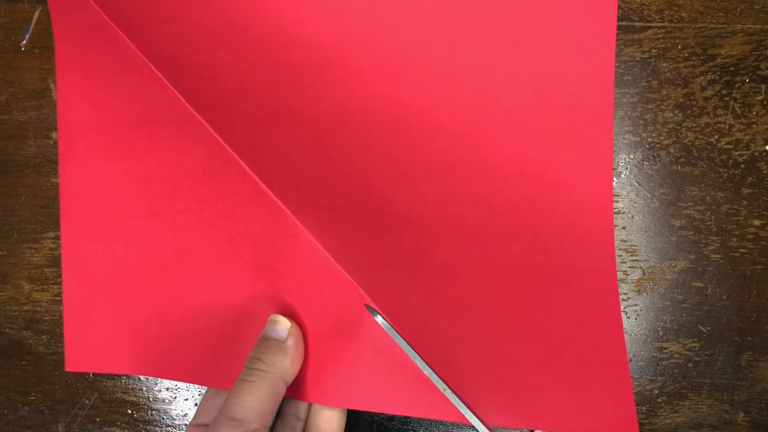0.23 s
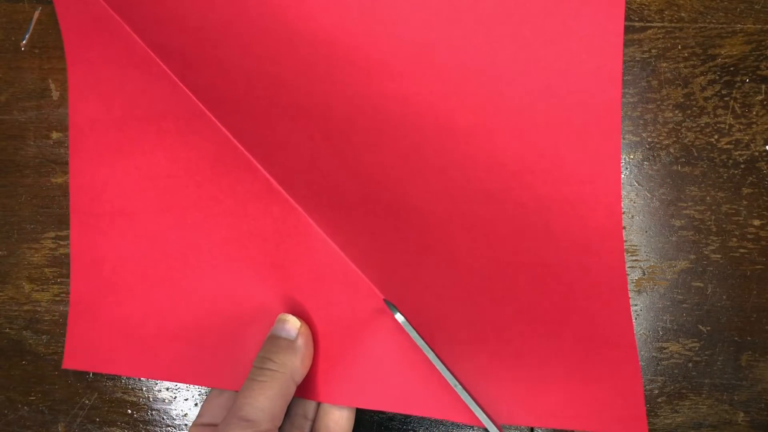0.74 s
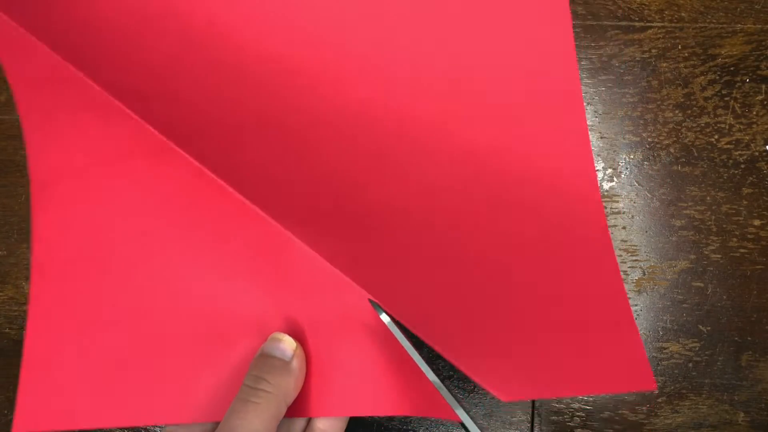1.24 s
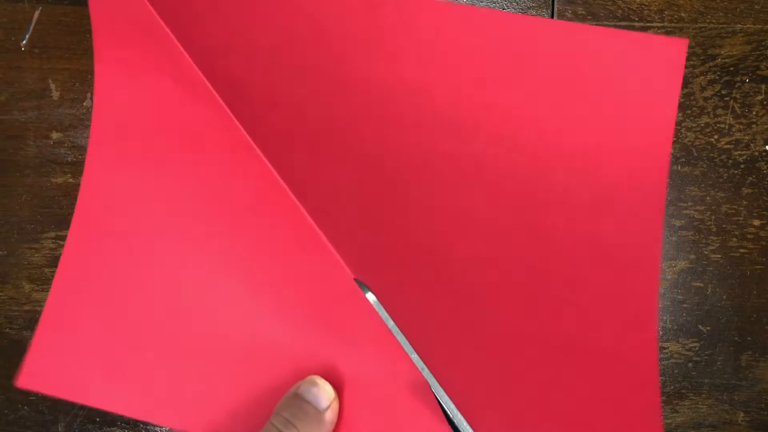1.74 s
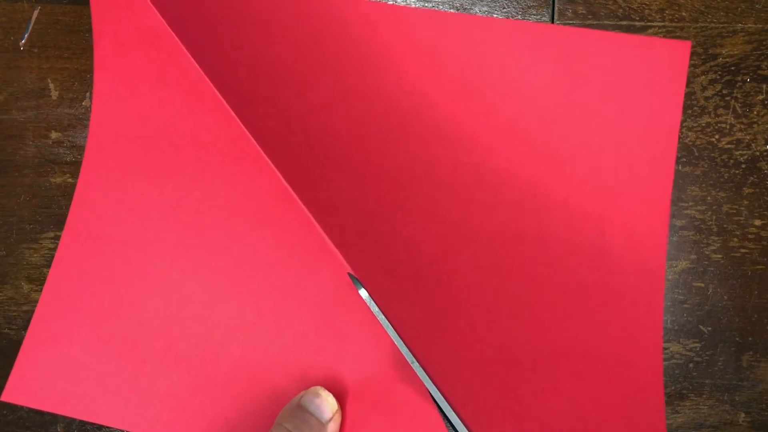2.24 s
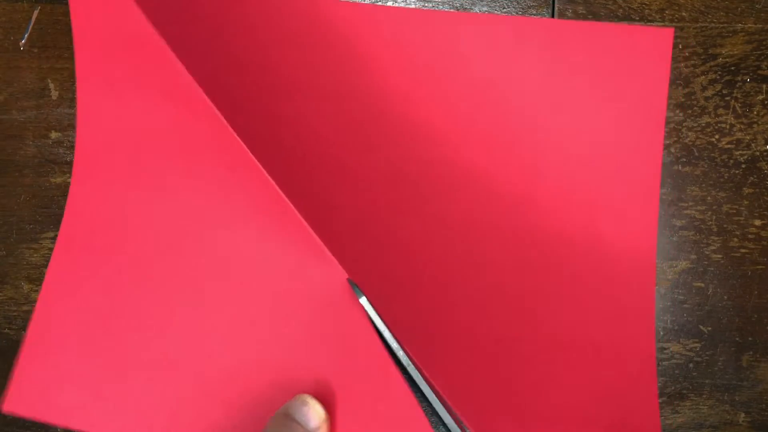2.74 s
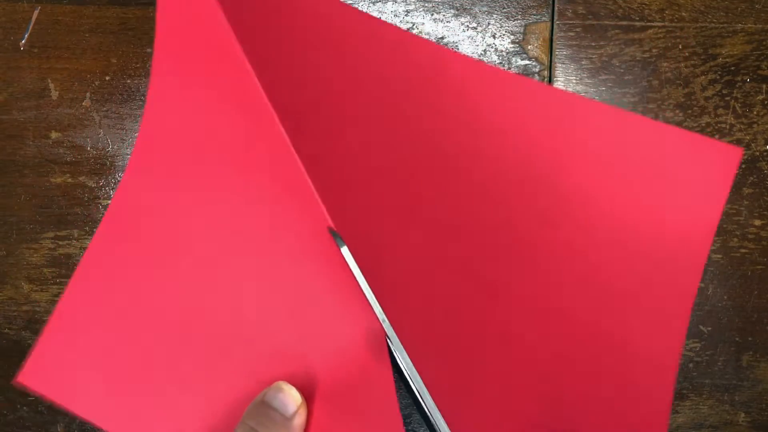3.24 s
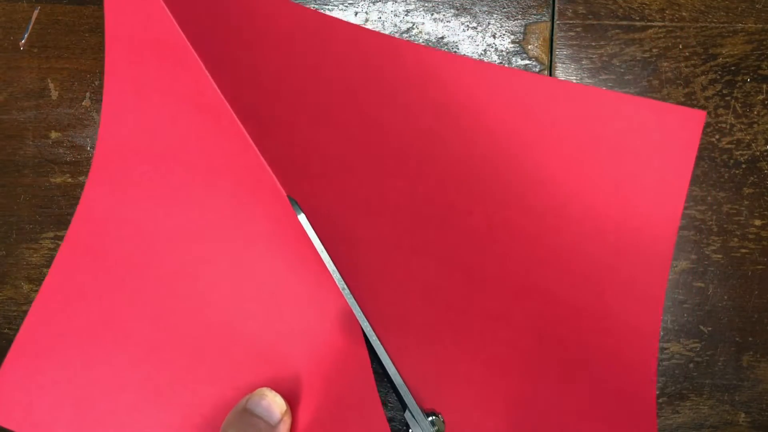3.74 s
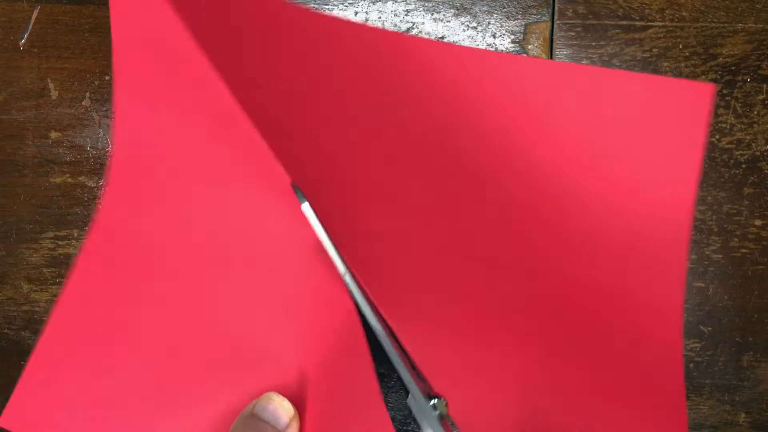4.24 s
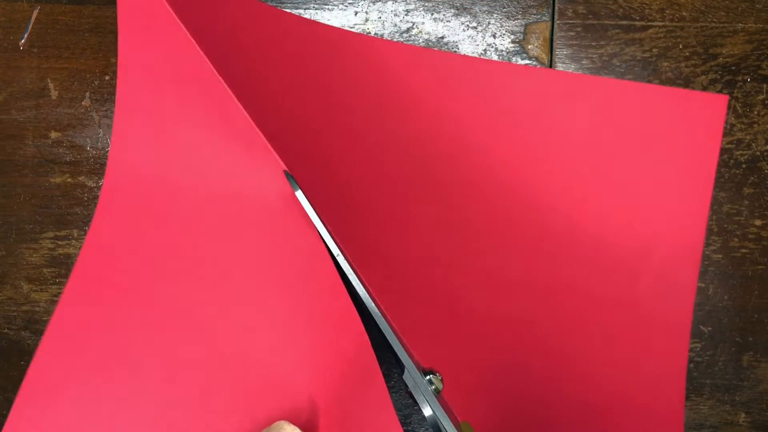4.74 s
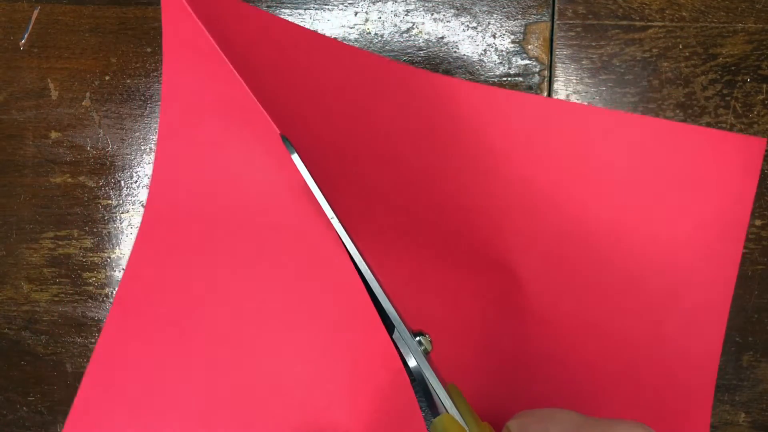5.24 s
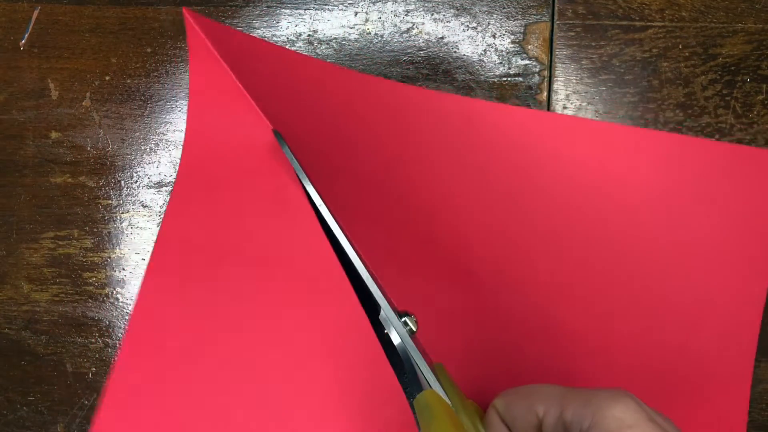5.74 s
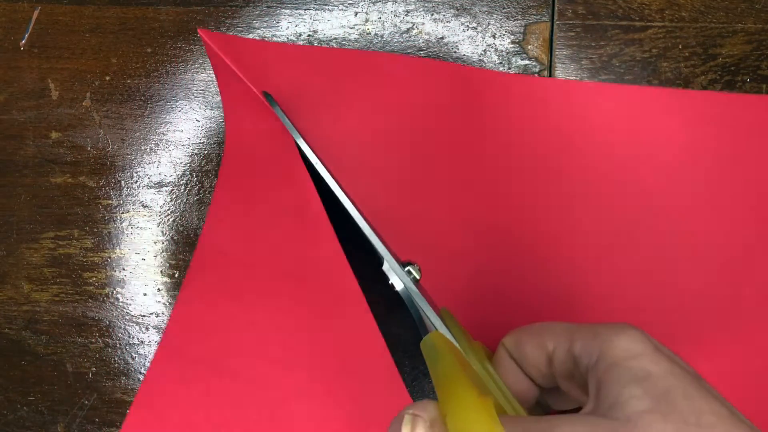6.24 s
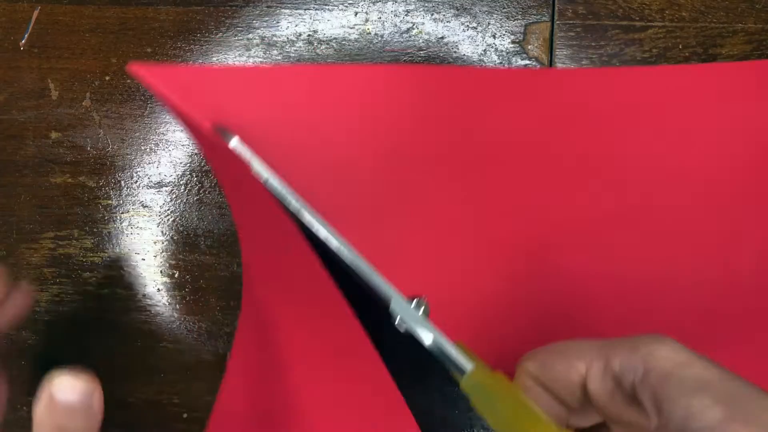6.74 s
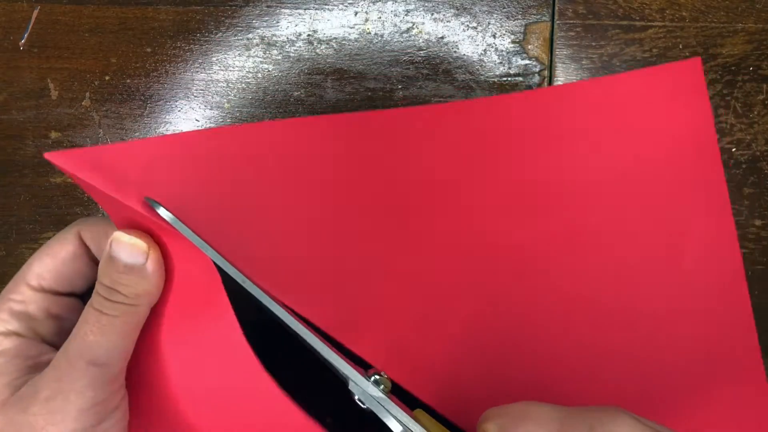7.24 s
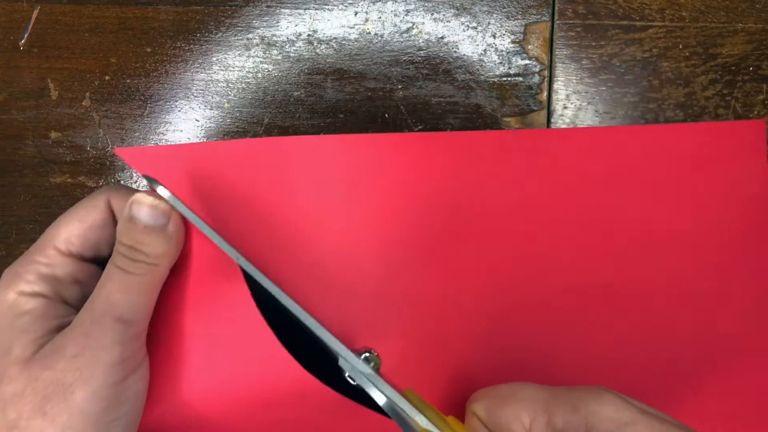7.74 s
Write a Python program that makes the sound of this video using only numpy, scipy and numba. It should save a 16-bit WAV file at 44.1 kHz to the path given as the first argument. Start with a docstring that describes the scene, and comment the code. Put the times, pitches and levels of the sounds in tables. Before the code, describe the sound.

Scissors cut stiff paper in crisp, jerky crunching bursts, with papery rasps and dull sheet knocks between, close up in a quiet room.

```python
"""Quiet room, stiff folded paper held over a wooden table, scissors at work; one microphone, close by.
First the closing blades tear in quick jerks; from 0.9 s sliding rasps lead, then jerks return from 1.8 s.
Rasps at 2.7 s, more jerks from 3.3 s, the strongest near 5.7 s; after 6.6 s mostly faint rasps and ticks.
Random tiny fibre cracks are heard bare, through ringing sheet and blades, and through the loose flap;
dull knocks, snaps and low thumps fall between, over a short room echo and steady hush."""
import sys
import numpy as np
from scipy import signal
from scipy.io import wavfile
from numba import njit

SR = 44100
rng = np.random.default_rng(int(sys.argv[2]) if len(sys.argv) > 2 else 0)


def int16_out(signal):
    """Quantize to a 16-bit WAV file."""
    q = np.round(np.clip(np.atleast_2d(signal).T, -1, 1) * 32767)
    wavfile.write(sys.argv[1], SR, q.astype(np.int16))


N = 353064   # samples, 8 s

BEND_PER_S = 4.94   # how often the bending paper changes its colour
PITCH_WANDER = 0.05   # share by which bending detunes each resonance


def from_db(db):
    """Decibels to gain."""
    return 10 ** (np.asarray(db) / 20)


def rms_one(x):
    """Scale to unit rms."""
    return x / np.sqrt(np.mean(x ** 2) + 1e-20)


def drift(rate):
    """Slow chance of spread 1, changing about rate times a second: noise through a two-pole low-pass."""
    step = 20   # samples between drawn points
    r = np.exp(-2 * np.pi * rate * step / SR)
    slow = signal.lfilter([1], [1, -2 * r, r * r], rng.standard_normal(N // 10))
    slow = rms_one(slow[-N // step:])   # the settled part
    return np.interp(np.arange(N) / step, np.arange(len(slow)), slow)


def coloured(x, spectrum, patchy_db=0, count=11):
    """Band-passes, count to the octave, alternate in sign; each follows the spectrum and wanders in level."""
    hz, db = np.transpose(spectrum)
    edges = hz[0] * 2 ** np.arange(0, np.log2(hz[-1] / hz[0]), 1 / count)
    out = 0
    for k, (low, high) in enumerate(zip(edges, edges[1:])):
        level_db = np.interp(np.log(low * high) / 2, np.log(hz), db)
        gain = from_db(level_db + patchy_db * drift(BEND_PER_S))
        band = signal.butter(2, [low, high], "band", fs=SR, output="sos")
        out = out + (-1) ** k * gain * signal.sosfilt(band, x)
    return out


@njit
def swept(x, pull, r):
    """Each row passes twice through a resonance whose centre moves; pull is the cosine of its turn per sample."""
    out = x.copy()
    for row in range(x.shape[0]):
        for _ in range(2):
            x1 = x2 = y1 = y2 = 0.
            for i in range(x.shape[1]):
                y = (1 - r * r) / 2 * (out[row, i] - x2) + 2 * r * pull[i] * y1 - r * r * y2
                x2, x1, y2, y1 = x1, out[row, i], y1, y
                out[row, i] = y
    return out


# Balance between the two colourings of sheet and blades: time_s, second_share (0-1)
COLOUR_BALANCE = [(1.9, 0), (4.781, 0.84), (6.3, 1), (6.5, 0.96), (7.599, 0.64)]


def resonant(x, modes, patchy_db):
    """Parallel resonances; their balance shifts over time, level and pitch wander as the paper bends."""
    second_share = np.interp(np.arange(N) / SR, *np.transpose(COLOUR_BALANCE))
    out = 0
    for hz, width, first_db, second_db in modes:
        turn = 2 * np.pi * hz * np.exp(PITCH_WANDER * drift(BEND_PER_S)) / SR
        level_db = first_db + second_share * (second_db - first_db)
        gain = from_db(level_db + patchy_db * drift(BEND_PER_S))
        ring = swept(x + 1e-18, np.cos(turn), np.exp(-np.pi * width / SR))
        out = out + gain * ring
    return out


# Room and microphone noise, its relative spectrum: pitch_hz, level_db (per Hz)
HUSH_SPECTRUM = [(40, -10), (120, -1), (250, -2), (600, -10), (1500, -10), (4000, -14), (9000, -23),
                 (19000, -55)]
HUSH_DB = -66   # rms, ahead of the microphone


def hush():
    """Steady noise of room and microphone: white noise in coloured bands."""
    return from_db(HUSH_DB) * rms_one(coloured(rng.standard_normal(N), HUSH_SPECTRUM, count=4))


ROOM_T60_S, ROOM_DB, WALL_CUT_HZ = 0.22, -21.5, 8200   # T60 of the bass; treble dies sooner


def room(x):
    """Ten feedback delays, duller on every round, stepped block by block."""
    out, dull = np.zeros(N), np.exp(-2 * np.pi * WALL_CUT_HZ / SR)
    lags = (rng.uniform(.006, .025, 10) * SR).astype(int)
    for k, lag in enumerate(lags):
        loop, gain, state = x.copy(), from_db(-60 * lag / SR / ROOM_T60_S), [0.]
        for i in range(lag, N, lag):
            back, state = signal.lfilter([gain * (1 - dull)], [1, -dull], loop[i - lag:i], zi=state)
            loop[i:i + lag] += back[:N - i]
        out += (loop - x) * (-1) ** k   # the echoes alone
    return out


# The whole sheet flaps with a low thump: start_s, level_db (envelope peak), pitch_hz
THUMPS = [(1.256, -36, 470), (1.511, -41, 446), (1.649, -47.5, 168.4), (2.574, -39, 214), (2.62, -43, 165),
          (3.274, -34, 356), (3.685, -47, 314), (5.039, -39.5, 355), (5.229, -39, 252), (5.685, -44, 328)]
THUMP_CYCLES = 2.8   # the swell crests after half of these


def thumps():
    """The whole sheet flaps: a few low cycles that swell and die."""
    out = np.zeros(N)
    for start, db, hz in THUMPS:
        turns = np.arange(SR // 8) / SR * hz
        age = turns / THUMP_CYCLES * 2
        swell = np.e * age * np.exp(-age)   # crest 1
        at = round(start * SR)
        out[at:at + len(turns)] += from_db(db) * swell * np.sin(2 * np.pi * turns)
    return out


CRACKS_PER_S, CRACK_SPREAD_DB = 12000, 3.5


def cracks():
    """Fibres snap at random moments with uneven sizes; rms 1."""
    sizes = from_db(CRACK_SPREAD_DB * np.minimum(rng.exponential(1, N), 5))
    signed = sizes * rng.choice([-1, 1], N)
    return rms_one(signed * (rng.random(N) < CRACKS_PER_S / SR))


def sounded(strength, body, table, patchy_db):
    """A body colours fresh cracks of the given strength, scaled so that steady unit cracks come out at 1."""
    fibres = cracks()
    played, steady = body(np.stack([fibres * strength, fibres]), table, patchy_db)
    return played / np.std(steady)


# The loose flap beside the cut: time_s, pitch_hz, level_db (re crackle and blade strengths together)
FLAP = [(0.95, 4430, -13), (1.05, 4530, -9), (1.3, 3800, -19.5), (1.75, 3430, -1.5), (2.048, 3800, -20),
        (2.97, 4130, -9.5), (3.12, 2700, -27), (3.72, 4740, -15), (3.9, 4980, -19), (6.53, 2570, -12),
        (6.586, 1200, 9), (6.63, 3440, -25), (7.15, 4070, -6), (7.29, 2230, -8.5), (7.46, 2210, -10.5),
        (7.53, 2880, -30)]
FLAP_WIDTH_HZ = 590   # of each of the two passes


def flap_ring(crackle, blades):
    """The loose flap rings on the cracks at a pitch that moves as it bends."""
    when, hz, db = np.transpose(FLAP)
    t = np.arange(N) / SR
    strength = (crackle + blades) * from_db(np.interp(t, when, db))
    mode = (np.interp(t, when, hz), FLAP_WIDTH_HZ, 0, 0)   # alike in both colourings
    return sounded(strength, resonant, [mode], 2.5)


# Sheet resonances in two colourings: pitch_hz, width_hz (each pass), first_db, second_db
SHEET_MODES = [(228, 360, -14.5, -9), (427.5, 164, -7, 0), (764, 282, -0.5, 4.5), (936, 493, 2.5, 3),
               (1495, 161, -5.5, 9)]


def sheet_drumming(strength):
    """The cracks drum on the sheet and excite its low resonances."""
    return sounded(strength, resonant, SHEET_MODES, 2.5)


# Blade resonances in two colourings: pitch_hz, width_hz (each pass), first_db, second_db
BLADE_MODES = [(2666, 1130, -6.5, 6.5), (3270, 396, 7.5, 2), (3300, 2460, -21, 10.5), (4860, 460, -35, 6),
               (5290, 740, -17, 4), (7660, 133, -6.5, 2.5), (9550, 340, -12, -8)]


def blade_ring(strength):
    """The cracks ring in the blades at their higher resonances."""
    return sounded(strength, resonant, BLADE_MODES, 1.8)


# Relative spectrum of the bare crackle: pitch_hz, level_db (per Hz)
CRACKLE_SPECTRUM = [(1800, -6.5), (2500, -1), (4000, -6), (6000, -6), (8500, -6), (12000, -13),
                    (19000, -15.5)]


def bare_crackle(strength):
    """The cracks are heard directly, in patches of colour that wander."""
    return sounded(strength, coloured, CRACKLE_SPECTRUM, 5.0)


# From here, three rows of strength: crackle, sheet, blades.
AFTER_RUSTLE_DB, STROKE_RUSTLE_DB, AFTER_RUSTLE_S = -29.5, -38.5, 0.074   # after a jerk or knock, a stroke


def lingering(strengths, db):
    """Torn fibres go on parting: a faint rustle dies away exponentially."""
    linger = np.exp(-1 / (AFTER_RUSTLE_S * SR))
    return strengths + from_db(db) * signal.lfilter([1 - linger], [1, -linger], strengths)


# Strokes of blades and fingers along the paper: start_s, rise_s (to the turning point), fall_s (from it),
# level_db (crackle at the turning point), rise_db and fall_db (start and end relative to it, positive is
# quieter), sheet_db and blade_db (re crackle)
SLIDES = [(0.037, 0.0099, 0.038, -55.5, 32, 15, -4, -8), (0.11, 0.3, 0.18, -66, -6, 0, -4, -6),
          (0.903, 0.009, 0.099, -46, 5, 30, 6.5, 1.5), (1.029, 0.036, 0.074, -50.5, 2, 13, -8, -3),
          (1.115, 0.063, 0.15, -43.5, 8, 6.5, -1, -20), (1.331, 0.06, 0.052, -60, -16, -11, -4, -7),
          (1.422, 0.068, 0.28, -38.5, 7.5, 14, -11, -4), (1.561, 0.087, 0.091, -54, 6, 3.5, 19.5, 8),
          (1.718, 0.044, 0.1, -64, 4, 16.5, 24, 24), (1.839, 0.011, 0.1, -68, 0, 17, 24.5, 22.5),
          (2.738, 0.016, 0.097, -49.5, 13, 38, 10, 1.5), (2.9, 0.027, 0.054, -44, 16, 7, 0.5, -26),
          (2.967, 0.012, 0.082, -45, -7, 1, -4, 4.5), (3.044, 0.072, 0.055, -38.5, 8.5, 9, -2, 3.5),
          (3.164, 0.081, 0.034, -39, 1, -1, 2.5, -9), (3.367, 0.12, 0.06, -53, 13.5, 1, 9, 2.5),
          (3.609, 0.022, 0.05, -58, -1.5, 3, -4.5, -14.5), (3.699, 0.0095, 0.14, -48.5, -5, 8.5, 9, -14),
          (4.195, 0.047, 0.22, -38, 18, 18.5, 5.5, 2), (4.83, 0.041, 0.25, -39.5, 9.5, 6, 2, 1),
          (5.403, 0.031, 0.18, -39.5, 6.5, 4.5, -1, -1.5), (5.74, 0.016, 0.12, -56, 5, 6, -10, -10),
          (5.848, 0.16, 0.096, -43.5, 7.5, 22, 1.5, 5), (6.355, 0.027, 0.086, -43, 24, 12.5, -2, -0.5),
          (6.467, 0.026, 0.044, -69, -1, 5, 22.5, -22), (6.512, 0.055, 0.11, -48.5, 5.5, 11, 1, 1.5),
          (6.7, 0.078, 0.15, -58, 22, 1.5, -16, -29), (6.947, 0.0093, 0.059, -52.5, 3, 25, -6, 4),
          (7.008, 0.056, 0.1, -49, 9.5, 27, 6, 0), (7.101, 0.055, 0.078, -49, 6, 16, -22, 1),
          (7.215, 0.26, 0.045, -41, 8.5, 5, -12, -14), (7.485, 0.018, 0.052, -46.5, 2, -1, -14, -6),
          (7.5, 0.1, 0.056, -69.5, 10, 4, 25, 5), (7.64, 0.016, 0.047, -38, -6, 13, -1, -7),
          (7.68, 0.089, 0.064, -49.5, 0.5, 12, -9, -2), (7.889, 0.012, 0.12, -59.5, -1, 13, 7.5, 10.5)]
STROKE_EDGE_S, STROKE_RELEASE_S = 0.0045, 0.039


def slides():
    """Each stroke starts abruptly, moves through its middle level and lets go; the grain makes it stumble."""
    out = np.zeros((3, N))
    for start, rise, fall, db, rise_db, fall_db, sheet_db, blade_db in SLIDES:
        end = start + rise + fall
        at = np.arange(round(start * SR), min(round(end * SR), N))
        t = at / SR
        edge = np.clip(np.minimum((t - start) / STROKE_EDGE_S, (end - t) / STROKE_RELEASE_S), 0, 1)
        level_db = np.interp(t, [start, start + rise, end], [db - rise_db, db, db - fall_db])
        out[:, at] += edge * from_db(level_db + np.array([[0], [sheet_db], [blade_db]]))
    out = lingering(out, STROKE_RUSTLE_DB)
    own = np.stack([drift(25.0) for _ in out])   # each body catches the grain a little differently
    grain_db = 1.15 * drift(44) + 0.78 * drift(420) + 2.0 * own
    return out * from_db(grain_db)


# Sharp snaps at the blade edge: start_s, crackle_db, sheet_db, blade_db
SNAPS = [(0.864, -46, -22.5, -45), (1.252, -36, -34, -40), (1.328, -28, -16.5, -48),
         (2.85, -56, -42, -19.5), (2.894, -21.5, -30, -50), (2.97, -50, -26, -37), (3.171, -56, -18, -65),
         (3.53, -37, -33, -54), (3.87, -42, -29, -31), (5.522, -58, -23.5, -56), (5.883, -57, -28.5, -50),
         (6.373, -57, -41, -31.5), (7.078, -36, -36, -25.5), (7.221, -51, -28.5, -32),
         (7.563, -51, -33, -44)]
SNAP_DECAY_S = 0.0015


def snaps():
    """A snap starts at once and dies within a few milliseconds."""
    out, t = np.zeros((3, N)), np.arange(SR // 30) / SR
    for start, *levels_db in SNAPS:
        at = round(start * SR)
        out[:, at:at + len(t)] += np.outer(from_db(levels_db), np.exp(-t / SNAP_DECAY_S))
    return out


JERK_LEAN, JERK_ROUNDNESS = 0.47, 1.52   # a lean below 1 puts the crest early


def add_burst(out, start, length, strengths):
    """Add one rounded burst that swells fast and stops at its length."""
    share = np.linspace(0, 1, round(length * SR))
    shape = np.abs(np.sin(np.pi * share ** JERK_LEAN)) ** JERK_ROUNDNESS
    at = round(start * SR)
    out[:, at:at + len(share)] += np.outer(strengths, shape)


# The sheet buckles with a dull knock: start_s, sheet_db, length_s
KNOCKS = [(1.069, -34, 0.023), (1.095, -33, 0.013), (1.109, -35, 0.0095), (1.165, -30, 0.01),
          (1.193, -30.5, 0.0054), (3.226, -25, 0.02), (4.138, -39, 0.0042), (4.438, -25.5, 0.0028),
          (6.803, -47, 0.022), (6.965, -43, 0.043), (7.157, -30, 0.015)]


def knocks():
    """The buckling sheet knocks: bursts that stir the sheet alone."""
    out = np.zeros((3, N))
    for start, db, length in KNOCKS:
        add_burst(out, start, length, from_db(db) * np.array([0, 1, 0]))
    return out


# Jerks of the closing blades: start_s, level_db (crackle peak), length_s
JERKS = [(0.1144, -30.5, 0.024), (0.1838, -24, 0.014), (0.203, -30.5, 0.0088), (0.228, -32, 0.021),
         (0.275, -20.5, 0.013), (0.319, -28, 0.023), (0.368, -28.5, 0.024), (0.42, -32, 0.02),
         (0.486, -35, 0.011), (0.511, -32.5, 0.039), (0.54, -30.5, 0.017), (0.603, -21, 0.016),
         (0.6316, -23.5, 0.016), (0.652, -28.5, 0.016), (0.674, -25, 0.027), (0.737, -24.5, 0.03),
         (0.776, -21.5, 0.013), (0.801, -21, 0.033), (0.837, -23.5, 0.021), (0.8583, -19.5, 0.012),
         (1.327, -25.5, 0.016), (1.793, -37.5, 0.025), (1.869, -35.5, 0.041), (2.02, -30, 0.048),
         (2.065, -23.5, 0.02), (2.085, -36, 0.042), (2.127, -32, 0.013), (2.164, -28, 0.024),
         (2.233, -30, 0.036), (2.265, -37, 0.035), (2.312, -29, 0.017), (2.408, -43.5, 0.028),
         (2.433, -32, 0.031), (2.466, -33.5, 0.027), (2.503, -28, 0.028), (2.544, -29, 0.014),
         (2.561, -26.5, 0.015), (2.588, -23.5, 0.014), (2.6238, -18.5, 0.0074), (2.871, -31.5, 0.05),
         (3.274, -23, 0.014), (3.401, -38, 0.0095), (3.4593, -32.5, 0.021), (3.505, -33, 0.011),
         (3.675, -28, 0.023), (3.705, -32.5, 0.024), (3.74, -35, 0.013), (3.809, -34.5, 0.0076),
         (3.8413, -35.5, 0.039), (3.901, -22.5, 0.029), (3.928, -32, 0.027), (3.9574, -24, 0.033),
         (4.0156, -20, 0.018), (4.054, -26, 0.017), (4.0898, -25, 0.014), (4.401, -32.5, 0.065),
         (4.537, -21.5, 0.036), (4.561, -28.5, 0.022), (4.583, -21, 0.016), (4.604, -27, 0.026),
         (4.6455, -25, 0.022), (4.666, -33.5, 0.031), (5.173, -31.5, 0.08), (5.198, -21, 0.011),
         (5.216, -20, 0.039), (5.266, -15, 0.012), (5.6476, -22, 0.048), (5.665, -14.5, 0.034),
         (5.6954, -12, 0.028), (5.724, -16, 0.0088), (6.1457, -27.5, 0.043), (6.186, -21, 0.023),
         (6.222, -26, 0.014), (6.549, -27, 0.013), (6.57, -25, 0.0096), (6.77, -51, 0.027),
         (6.827, -39.5, 0.019), (7.056, -40, 0.0074), (6.895, -43, 0.017), (7.306, -36, 0.042),
         (7.595, -51, 0.009), (7.624, -32, 0.022), (7.637, -26, 0.017), (7.939, -39.5, 0.013)]
# What the bodies take up of a jerk as the grip changes: time_s, sheet_db, blade_db (re crackle)
UPTAKE = [(0.1, -18, -47), (0.55, -19.5, -39), (0.62, -20, -26.5), (0.79, -15, -17), (0.86, -2.5, -12),
          (1.33, -8, -37), (1.8, -1, 4.5), (2.06, -7, -12), (2.438, -4, -1.5), (2.63, 4.5, -4.5),
          (2.86, -13, -9), (3.3, 1.5, -10.5), (3.7, -5, -9.5), (4.65, -8, -10.5), (5.2, -12, -18.5),
          (5.72, -18.5, -26), (6.15, -12.5, -15.5), (6.566, -12.5, -16), (7.64, -51, -8)]
CREST_DB = 14.5   # taken from a crackle peak to give its strength


def jerks():
    """Each jerk swells fast and stops when the blades stick again."""
    out = np.zeros((3, N))
    when, sheet_db, blade_db = np.transpose(UPTAKE)
    for start, db, length in JERKS:
        uptake_db = np.array([-CREST_DB, np.interp(start, when, sheet_db), np.interp(start, when, blade_db)])
        add_burst(out, start, length, from_db(db + uptake_db))
    return out


JERK_STUMBLE_DB, SHEET_LAG_S = 0.92, 0.004


def jerks_and_knocks():
    """Bursts leave a rustle and stumble as the tear catches; the sheet takes them up and lets go later."""
    out = lingering(jerks() + knocks(), AFTER_RUSTLE_DB)
    out *= from_db(JERK_STUMBLE_DB * drift(170))
    keep = np.exp(-1 / (SHEET_LAG_S * SR))
    out[1] = signal.lfilter([1 - keep], [1, -keep], out[1])
    return out


def cutting():
    """Slides, jerks, knocks and snaps set how hard fibres crack; each body colours cracks in its own way."""
    crackle, sheet, blades = slides() + jerks_and_knocks() + snaps()
    bodies = flap_ring(crackle, blades) + sheet_drumming(sheet) + blade_ring(blades)
    return bodies + bare_crackle(crackle)


def scene():
    """The cut, its echo and the room's hush, alike in both channels."""
    cut = cutting() + thumps()
    return np.tile(cut + from_db(ROOM_DB) * room(cut) + hush(), (2, 1))


MIC_LOW_HZ, CUTOFF_HZ = 104, 16300   # the top is 70 dB down from CUTOFF_HZ up


def record(dry):
    """The microphone drops the bass; a steep low-pass cuts the top."""
    thin = signal.sosfilt(signal.butter(2, MIC_LOW_HZ, "high", fs=SR, output="sos"), dry)
    return signal.sosfilt(signal.cheby2(16, 70, CUTOFF_HZ, fs=SR, output="sos"), thin)


dry = scene()
out = record(dry)
int16_out(out)
```